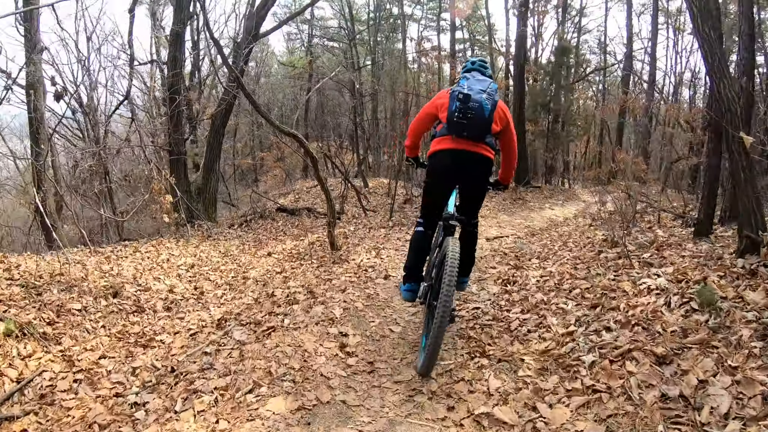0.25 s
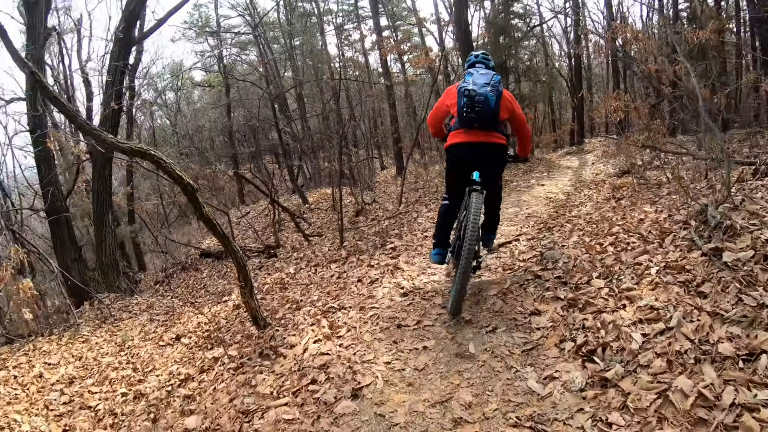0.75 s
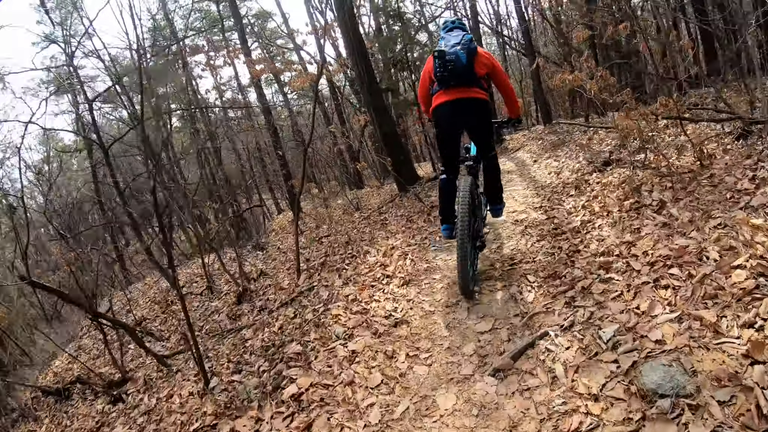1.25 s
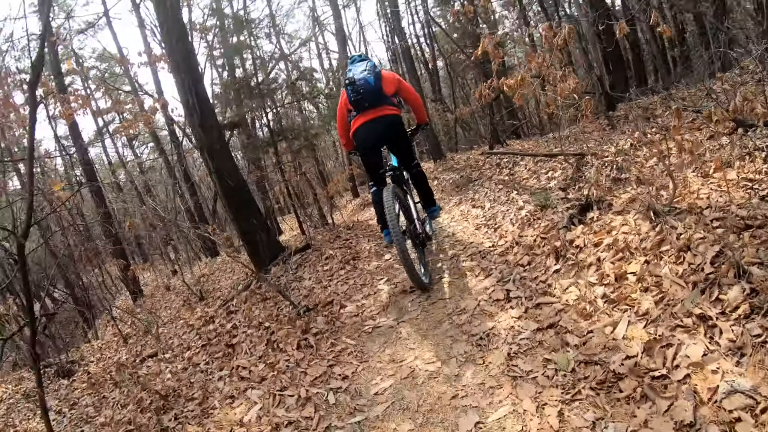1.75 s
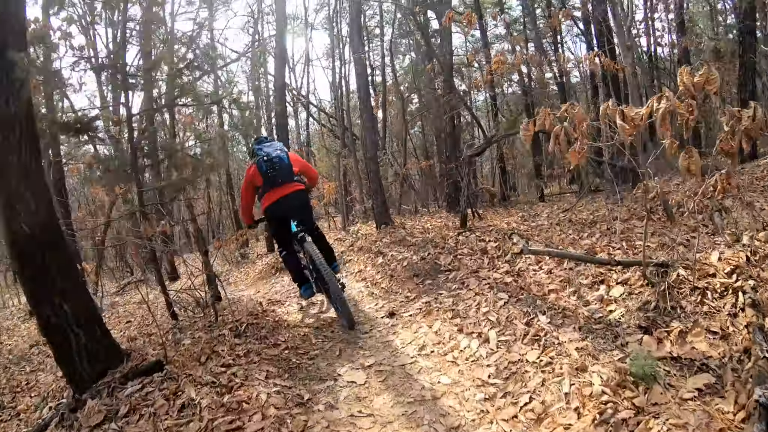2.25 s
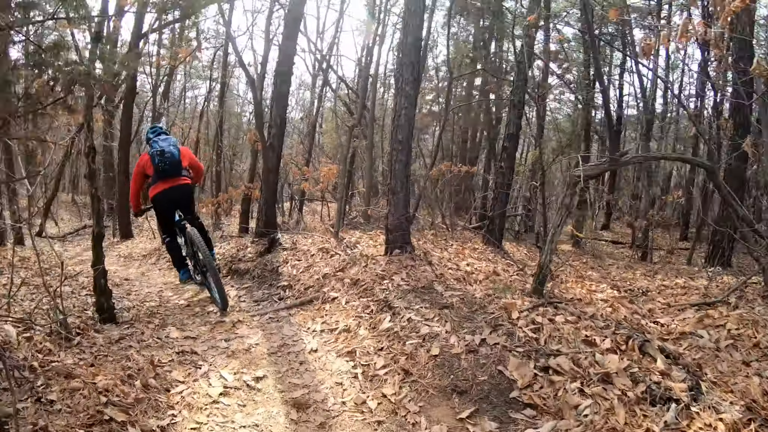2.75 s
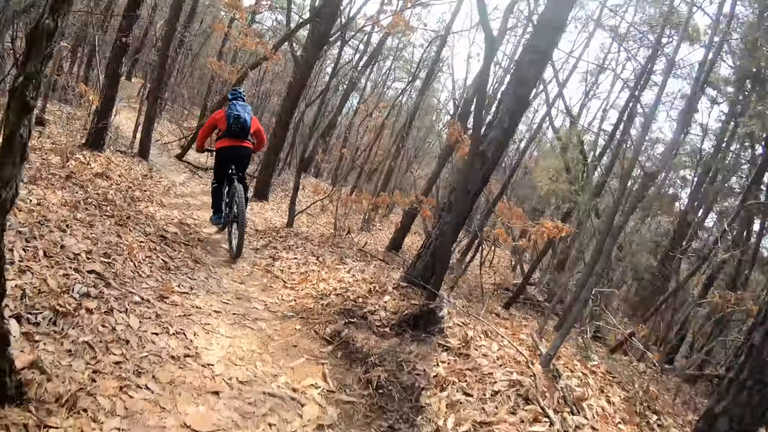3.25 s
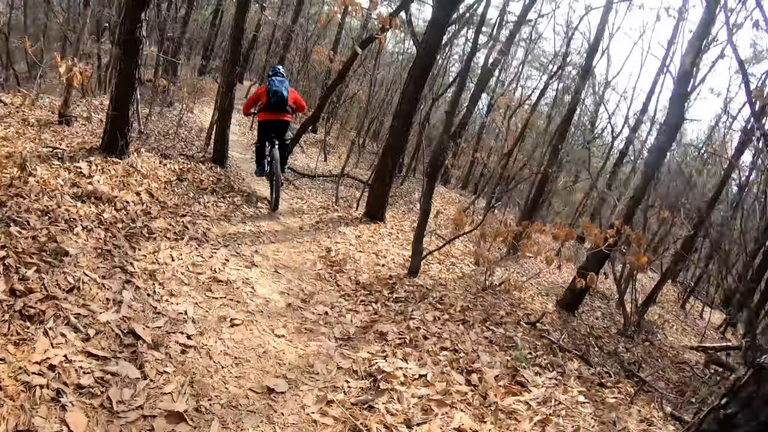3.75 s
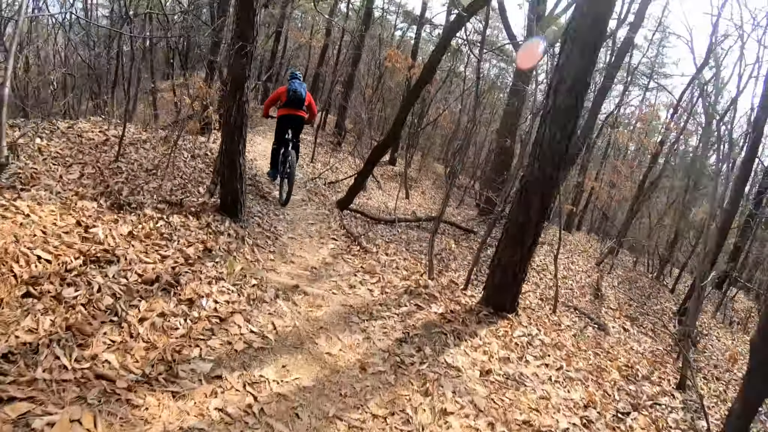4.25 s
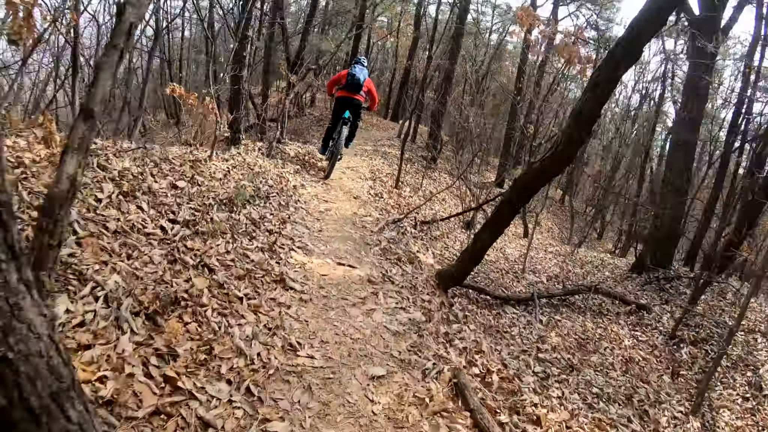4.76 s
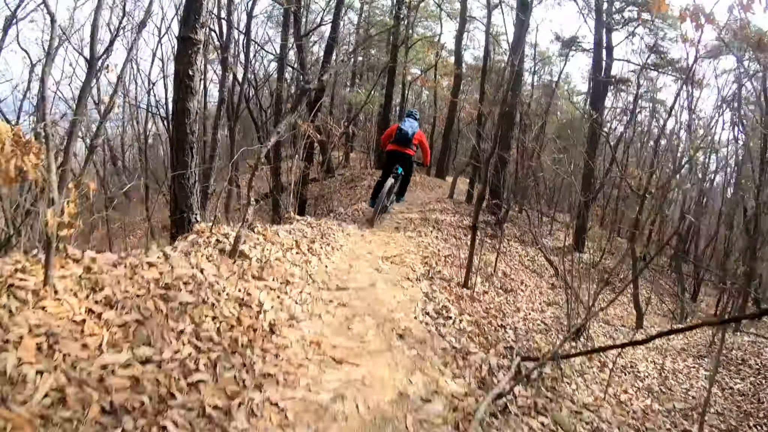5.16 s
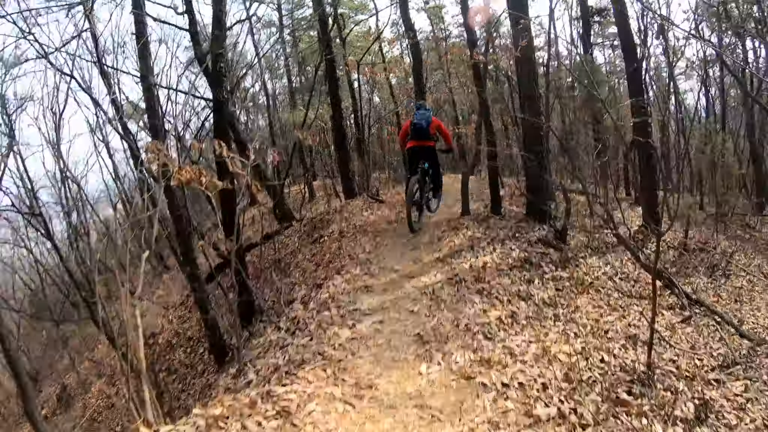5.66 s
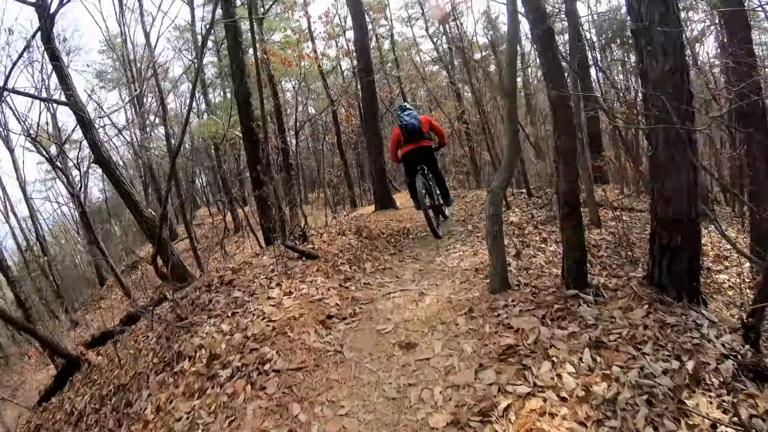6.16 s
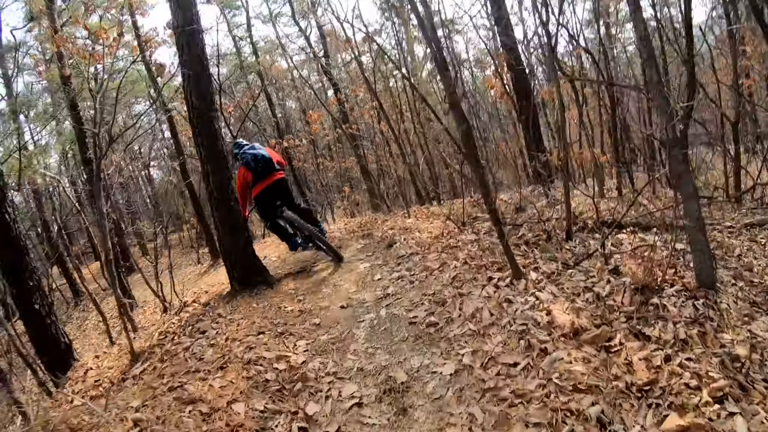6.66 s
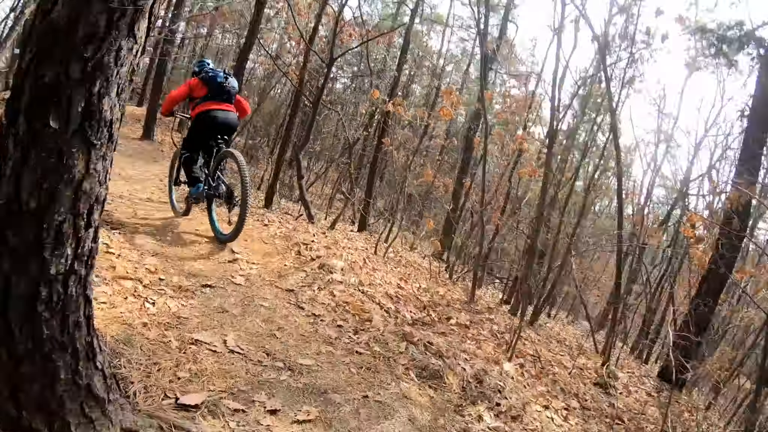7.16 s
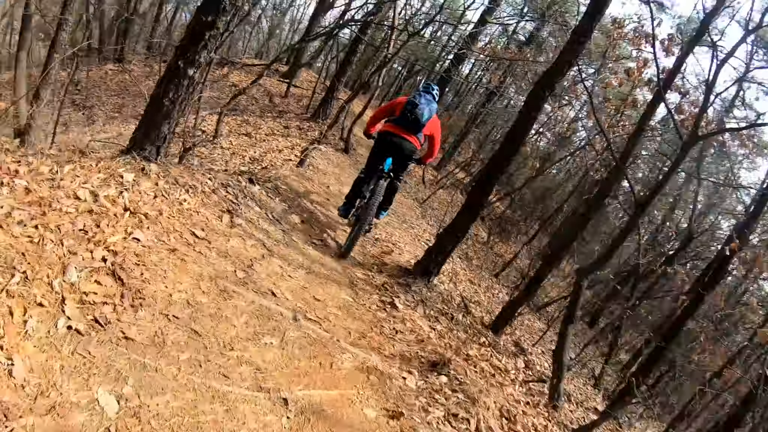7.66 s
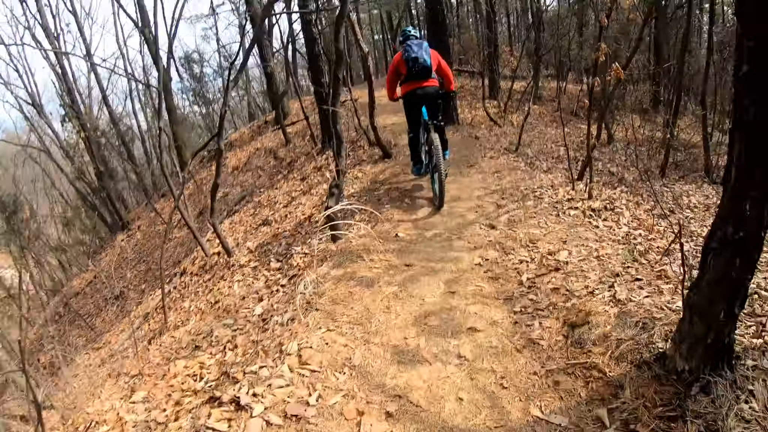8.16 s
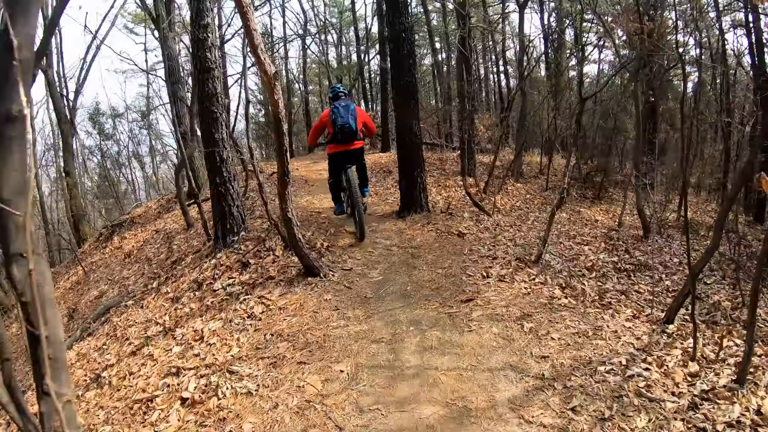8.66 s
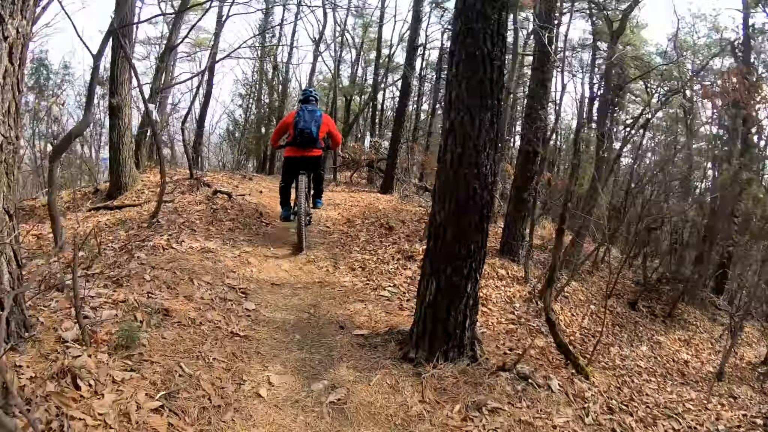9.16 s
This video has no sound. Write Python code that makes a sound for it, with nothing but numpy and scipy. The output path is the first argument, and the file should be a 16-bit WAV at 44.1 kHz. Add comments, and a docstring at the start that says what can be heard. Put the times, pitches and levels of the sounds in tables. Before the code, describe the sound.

A mountain bike descends a dry, leaf-covered forest trail, heard from a small cased camera mounted on it. Low wind rumble and fluttering buffets run throughout, swelling in irregular gusts, with a faint bright swish behind. Tyres crackle and crush leaves in uneven clumps. In the first second there are light clicks, a brief rub and soft thumps; around 1.4-1.9 s a sharper jolt brings clicks, hollow knocks and rapid chatter. It eases until about 3 s, then from 3.4 to 4.1 s hard bumps, crunches and rattles crowd together. More jolts and small scrapes come at 4.4-5.3 s, with stronger wind. A smoother roll follows until 6.5 s. The heaviest thumps and plastic knocks hit near 6.9 s, with a strong gust at 7.2 s, a knock at 7.8 s and a busy cluster at 7.9-8.6 s. It calms, then clicks and gusts again around 9.4 s.

```python
"""On a dry, leafy forest trail a small camera rides down on a mountain bike.
Wind is shaped noise in lumps and gusts; leaves under the tyres are many short cracks and crushing noise.
Bumps thump as sagging sine swings; loose parts click and chatter, and knocks ring the case's modes.
Gusts and rough ground ring the hollow too; rubs and a rushing swish lie behind."""
import sys
import numpy as np
from scipy import signal
from scipy.fft import rfft, irfft, next_fast_len
from scipy.io import wavfile

SR = 44100
rng = np.random.default_rng(int(sys.argv[2]) if len(sys.argv) > 2 else 0)


def persist_wave(psi):
    """Save psi, clipped to +-1, as 16-bit WAV."""
    counts = np.round(np.clip(psi, -1, 1) * 32767).astype(np.int16)
    wavfile.write(sys.argv[1], SR, np.atleast_2d(counts).T)


N = 415422  # length in samples

# Hollow of the camera case. Each row: mode frequency in Hz, relative level in dB, t60 in seconds.
HOLLOW_MODES = [(1211.7, -4.5, 0.034), (1296, -3.5, 0.046), (1386, -3, 0.039), (1478, -2, 0.022),
                (1628, -4, 0.014), (1848, -8.5, 0.014)]


def wind():
    """Eddies pass the port in lumps; the smaller the eddy, the faster and deeper the lumps."""
    # Steady wind. Each row: time in seconds, then relative levels in dB of slow rumble, buffeting, sharp edge.
    steady_wind = [(0.0, -41, -40, -37), (0.08, -25.5, -35.5, -35), (0.68, -31, -38, -50.5),
                   (1.44, -25, -31.5, -41.5), (2.2, -30.5, -34, -50.5), (2.94, -27, -41.5, -39),
                   (3.41, -25.5, -26, -33), (3.88, -31, -22.5, -37.5), (4.3, -24, -24.5, -37.5),
                   (5.14, -22, -17, -34), (5.4, -22.5, -27, -42.5), (6.58, -31.5, -29, -45),
                   (6.95, -27, -30, -37.5), (7.53, -29.5, -27.5, -39), (8.18, -17.5, -21.5, -46),
                   (8.21, -37, -30.5, -49), (9.05, -23.5, -31, -49), (9.42, -35, -52, -54)]
    # Gusts slap the port. Each row: time of the top in seconds, relative buffeting level in dB,
    # relative sharp edge level in dB, length in seconds.
    gust_events = [(0.06, -17.5, -51, 0.2), (0.29, -19.5, -47, 0.066), (0.56, -17.5, -39, .12),
                   (1.49, -16, -37, 0.088), (1.79, -17.5, -36, 0.15), (2.55, -25.5, -53, 0.096),
                   (3.06, -25, -54, 0.18), (3.18, -19.5, -43, 0.039), (3.33, -19, -34, 0.11),
                   (3.53, -17.5, -36, 0.12), (3.72, -16, -27, 0.1), (3.95, -18, -36, 0.57),
                   (4.2, -23, -31, 0.13), (4.59, -17.5, -23.5, 0.15), (4.8, -31, -18, 0.032),
                   (4.98, -23, -22.5, 0.1), (5.22, -17.5, -24, 0.21), (5.62, -21, -33.5, 0.1),
                   (6.28, -21.5, -34.5, 0.19), (6.67, -16.5, -40, 0.1), (6.89, -16, -30, 0.11),
                   (7.19, -9.5, -32, 0.067), (7.84, -31, -41, 0.14), (8.06, -24, -30.5, 0.13),
                   (8.24, -19.5, -31.5, 0.096), (8.38, -17.5, -33, 0.16), (8.85, -17, -39, 0.066),
                   (9.4, -14.5, -28.5, 0.21)]
    # Colours of the three wind layers. Each row: frequency in Hz, relative density in dB per Hz.
    rumble_colour = [(15, -5.5), (25, -1.5), (45, -1), (70, -6), (110, -11.5), (160, -31)]
    buffet_colour = [(50, -18), (90, -5), (140, -1.5), (200, 1), (280, -5.5), (400, -15.5), (600, -44)]
    edge_colour = [(250, -11), (420, -1.5), (600, -7), (850, -15.5), (1100, -15), (1500, -49)]
    rumble_under_gust_db = -7.5  # slow rumble a gust brings along, against its buffeting
    edge_in_hollow_db = -8  # the sharp edge also blows across the hollow of the case

    rumble_db, buffet_db, edge_db = in_time(steady_wind)
    # shares of a gust's length in which it swells and dies by 1/e
    gust, gust_edge = swells(gust_events, rise=0.3, fall=0.42)
    white = rng.standard_normal((3, N))
    eddies = drift(29.8)

    rumble_gain = np.hypot(from_db(rumble_db - 2.0), from_db(rumble_under_gust_db) * gust)
    rumble = colour(white[0], rumble_colour) * rumble_gain

    buffet_gain = from_db(-2.5) * np.hypot(from_db(buffet_db), gust)
    buffet = colour(white[1] * from_db(2.97 * eddies), buffet_colour) * buffet_gain

    tearing = white[2] * from_db(2.88 * eddies + 2.45 * drift(40.0))
    edge_gain = from_db(-1.5) * np.hypot(from_db(edge_db), gust_edge)
    edge = colour(tearing, edge_colour) + from_db(edge_in_hollow_db) * ring_hollow(tearing)
    return rumble + buffet + edge * edge_gain


def rolling():
    """Leaves snap in clumps under the tyres; the rough ground shakes the hollow case."""
    # Steady rolling. Each row: time in seconds, relative case shaking in dB, relative leaf crunch in dB.
    steady_roll = [(0.0, -31.5, -41.5), (0.81, -39.5, -42), (1.54, -29, -36.5), (1.86, -32.5, -44),
                   (2.23, -42, -43), (2.91, -43.5, -42), (3.67, -24.5, -37), (4.33, -39, -45),
                   (4.85, -34, -40), (5.17, -32.5, -40), (5.38, -43, -44.5), (6.53, -37, -44),
                   (6.82, -33.5, -38.5), (7.24, -29, -42.5), (7.69, -36.5, -43.5), (8.13, -28.5, -39),
                   (9.08, -43.5, -48), (9.42, -51, -51)]
    # A wheel runs over a root, stone or heap of leaves. Each row: time of the top in seconds,
    # relative shaking in dB, relative crunch in dB, length in seconds.
    jolts = [(0.03, -30, -33.5, 0.17), (0.26, -22, -35.5, 0.092), (0.85, -26.5, -37, 0.1),
             (1.33, -37, -36.5, 0.43), (1.47, -16.5, -25, 0.049), (1.75, -19, -28.5, 0.084),
             (2.0, -26.5, -36, 0.11), (2.26, -26, -29.5, 0.021), (2.53, -29, -39, 0.051),
             (2.92, -33, -37, 0.078), (3.12, -19.5, -29, 0.04), (3.44, -19, -29.5, 0.15),
             (3.52, -14, -22, 0.062), (3.7, -17.5, -19.5, 0.029), (3.85, -20, -25.5, 0.027),
             (3.94, -22.5, -32, 0.086), (4.03, -30, -34, .03), (4.09, -25, -31, 0.034),
             (4.24, -22, -38, 0.023), (4.44, -19, -31, 0.037), (4.59, -41, -41, 0.078),
             (4.7, -18, -31.5, 0.064), (4.87, -22.5, -32.5, 0.11), (4.97, -22, -25.5, 0.068),
             (5.05, -16, -23.5, 0.021), (5.27, -26.5, -42, 0.16), (5.72, -29.5, -35, 0.22),
             (6.62, -31.5, -35.5, 0.35), (6.88, -17, -24.5, 0.097), (6.98, -19, -30, 0.022),
             (7.22, -34, -36.5, 0.1), (7.37, -28, -61, 0.21), (7.58, -24.5, -34, 0.04),
             (7.78, -26, -35.5, 0.1), (7.95, -21.5, -35.5, 0.093), (8.04, -20, -32, 0.039),
             (8.15, -17, -25, 0.047), (8.28, -27, -36, 0.027), (8.38, -20, -33.5, 0.15),
             (8.52, -28, -46, 0.11), (9.34, -24, -30.5, 0.057), (9.41, -15.5, -30.5, 0.11)]
    # Colour of the crunch. Each row: frequency in Hz, relative density in dB per Hz.
    leaf_colour = [(800, -11), (1500, -3.5), (1920, -2.5), (3090, 0), (3490, -1), (4650, -4.5), (4950, -12),
                   (8300, -20), (9500, -25), (12000, -33), (15000, -55)]

    # shares of a jolt's length in which it swells and dies by 1/e
    jolt_gains = swells(jolts, rise=0.24, fall=0.54)
    shaking, crunching = np.hypot(from_db(in_time(steady_roll)), jolt_gains)
    clumps = drift(55.0)
    snaps = leaf_snaps(clumps)
    crushing = litter_crushing(clumps)

    sharp_snaps = rms_one(np.diff(snaps, prepend=0))
    crunch = colour(sharp_snaps + from_db(9.5) * crushing, leaf_colour)
    jostling = grains(900 * from_db(2.5 * clumps), spread_db=6.5)
    shake = rms_one(jostling) + from_db(-1.5) * crushing
    return from_db(-4.5) * shaking * ring_hollow(shake) + from_db(-4.0) * crunching * crunch


def leaf_snaps(clumps):
    """Every snap is a short crack at one of 16 pitches; higher ones are weaker and die sooner."""
    born = grains(1200 * from_db(5.4 * clumps), spread_db=11.0)
    pitches_hz = np.geomspace(1700, 12000, 16)
    dealt = rng.integers(0, len(pitches_hz), N)
    snaps = np.zeros(N)
    for k, hz in enumerate(pitches_hz):
        t60 = 0.005 * (3000 / hz) ** 0.45
        snaps += ring(born * (dealt == k), hz, t60) / np.sqrt(hz)
    return snaps


def litter_crushing(clumps):
    """Coarse and fine litter give way partly together, partly each band in its own time."""
    edges_hz = np.geomspace(700, 16000, 8)
    crushing = np.zeros(N)
    for band in zip(edges_hz, edges_hz[1:]):
        band_pass = signal.butter(2, band, "band", fs=SR, output="sos")
        noise = signal.sosfilt(band_pass, rng.standard_normal(N))
        crushing += noise * from_db(1.8 * clumps + 2.8 * drift(35.0))
    return crushing


def thumps(rise_s=0.0015, fade_s=0.012, sag=1.6):
    """After a bump the mount swings a few cycles with a sagging pitch."""
    # Bumps through the mount. Each row: start in seconds, relative peak in dB, starting pitch in Hz.
    bumps = [(0.24, -13, 222), (0.55, -22, 199), (0.644, -12.5, 144), (1.48, -11.5, 202), (1.81, -10, 234),
             (2.549, -10.5, 122), (2.93, -18, 185), (3.406, -6, 246), (3.5, -9, 250), (3.538, -2.5, 232),
             (3.635, -9.5, 171), (3.7, -3, 211), (3.85, -4, 234), (3.93, -11, 304), (4.088, -9.5, 237),
             (4.582, -11, 236), (4.861, -15, 258), (4.962, -7, 292), (5.006, -5.5, 265), (5.296, -10, 202),
             (5.428, -10, 178), (5.781, -8.5, 237), (6.872, -1.5, 202), (6.906, -5, 226), (6.986, -7, 203),
             (7.178, -9, 193), (7.947, -9.5, 245), (8.034, -9.5, 295), (8.376, -3, 236), (8.58, -13.5, 218),
             (9.072, -10.5, 129)]
    out = np.zeros(N + SR)
    t = np.arange(SR // 10) / SR
    swell = (1 - np.exp(-t / rise_s)) * np.exp(-t / fade_s)
    turns = rng.random(len(bumps))  # starting phase in turns
    for (s, peak_db, hz), turn in zip(bumps, turns):
        at = round(s * SR)
        swing = np.sin(2 * np.pi * (hz * (t - sag * t ** 2) + turn))
        out[at:at + len(t)] += from_db(peak_db - 5.0) * swell / swell.max() * swing
    return out[:N]


def clicks(lead_s=0.0001):
    """A click rings the hollow, the shell and the fine treble modes of the case; a knock only the hollow."""
    # Loose parts click. Each row: time in seconds, relative level in dB, treble in dB against that level.
    loose_parts = [(0.02, -16.5, -11.5), (0.248, -22.5, -10.5), (0.2595, -17, -22), (0.408, -26, -16),
                   (0.4645, -23, -14), (1.1822, -23.5, -10), (1.293, -20, -19), (1.3243, -16, -25),
                   (1.3876, -20, -14), (1.394, -21, -20), (1.468, -14.5, -14.5), (1.504, -15, -25),
                   (1.7484, -11, -45), (1.775, -11, -39), (2.147, -20.5, -10.5), (2.2746, -26, -30),
                   (2.413, -22, -9.5), (2.4394, -19, -31), (2.903, -23, -10), (2.9312, -19.5, -36),
                   (2.9783, -24, -18), (3.05, -19.5, -14), (3.11, -25, -8.5), (3.1272, -20.5, -23),
                   (3.313, -24, -17), (3.4066, -24, -12), (3.425, -15, -26), (3.4428, -14, -18),
                   (3.451, -19, -13), (3.504, -14, -30), (3.516, -16, -28), (3.706, -12.5, -12),
                   (3.8314, -17.5, -24), (3.933, -11, -22.5), (3.9388, -13, -20), (3.9603, -15, -19),
                   (4.022, -21.5, -9), (4.09, -20.5, -18), (4.4302, -21, -17), (4.4413, -18, -31),
                   (4.4668, -20, -24), (4.5833, -25, -12), (4.597, -20.5, -24), (4.679, -18.5, -22),
                   (4.8227, -17, -19), (4.8814, -31, -29), (4.8968, -31, -33), (4.9561, -19, -10.5),
                   (4.9853, -14, -16), (4.9963, -15, -14.5), (5.698, -24.5, -9.5), (5.7087, -18, -19),
                   (5.72, -17, -29), (5.7616, -21.5, -17), (5.7974, -17.5, -25), (6.5638, -16, -16.5),
                   (6.5745, -19.5, -29), (6.6684, -11.5, -22), (6.7088, -14.5, -28), (6.7985, -19, -18),
                   (6.8733, -17, -13), (6.8821, -10.5, -24), (6.9036, -19.5, -11), (7.2534, -32, -17),
                   (7.9518, -15, -36), (7.964, -14, -22), (8.0275, -14, -28), (8.0347, -12, -23),
                   (8.0442, -14.5, -19), (8.063, -16, -33), (8.097, -21, -32), (8.147, -12.5, -17),
                   (8.271, -18.5, -22), (8.362, -13, -12.5), (8.375, -11.5, -18), (8.3986, -13.5, -27),
                   (8.405, -16.5, -18), (8.4085, -14, -18), (8.4325, -19, -22), (8.5565, -24, -15),
                   (8.5753, -16.5, -24), (8.738, -24, -18), (9.329, -25, -11), (9.3606, -14, -17.5),
                   (9.3715, -12, -26)]
    # Dull knocks. Each row: start in seconds, relative level in dB.
    knocks = [(0.533, -17), (0.839, -8), (1.325, -12), (1.423, -5.5), (3.385, -5), (3.498, -10),
              (3.693, -5), (3.9267, -12), (4.0219, -2), (4.948, -9), (5.05, -3), (6.6185, -3),
              (6.8433, -10), (6.8668, 1.5), (7.002, -10), (7.126, -8.5), (7.213, -6), (7.7697, -1),
              (8.3554, -22), (8.523, -5.5)]
    # Shell and treble of the case. Each row: mode frequency in Hz, relative level in dB, t60 in seconds.
    shell_modes = [(2120, -7, 0.016), (2910, -1, 0.005), (3500, -2, 0.013), (4260, -3, 0.0092)]
    treble_modes = [(5100, 1.9, 0.011), (6440, 12.6, 0.0029), (8040, 2.8, 0.0044), (9330, 1.1, 0.0041)]

    s, peak_db, treble_db = np.transpose(loose_parts + rattles())
    knock_s, knock_db = np.transpose(knocks)
    touch_s = s - lead_s
    body = strike(touch_s, peak_db - 10.0, HOLLOW_MODES, contact_s=0.00068)
    body += strike(touch_s, peak_db - 9.5, shell_modes, contact_s=0.0005)
    body += strike(knock_s, knock_db - 13.5, HOLLOW_MODES, contact_s=0.0019)
    edge = strike(touch_s, peak_db + treble_db - 9.0, treble_modes, contact_s=0.001)

    # light parts push no bass, and the padded case dulls the sharpest edges
    body_band = signal.butter(3, [1000, 5300], "band", fs=SR, output="sos")
    edge_low_pass = signal.butter(4, 10500, fs=SR, output="sos")
    return signal.sosfilt(body_band, body) + signal.sosfilt(edge_low_pass, edge)


def rattles():
    """A slack part chatters against the frame in taps, each a little off in time and strength."""
    # Runs of taps. Each row: first tap in seconds, last tap in seconds, gap in seconds, relative level in dB.
    runs = [(0.051, 0.134, 0.0277, -23), (0.295, 0.383, 0.029, -28), (1.557, 1.682, .031, -28),
            (1.796, 1.919, .0305, -22), (1.999, 2.120, 0.0305, -21), (2.529, 2.628, 0.033, -25),
            (3.555, 3.610, 0.027, -16), (3.666, 3.767, .0335, -18), (4.206, 4.277, 0.035, -23),
            (5.027, 5.159, 0.033, -28), (5.212, 5.333, .030, -24), (6.971, 7.036, 0.0325, -19),
            (7.171, 7.237, 0.033, -21), (7.516, 7.671, 0.031, -24.5), (7.805, 7.893, 0.029, -24),
            (8.154, 8.185, .031, -16)]
    treble_db, spread_db, jitter_s = -31, 1.5, 0.0005
    taps = []
    for first, last, gap, db in runs:
        count = round((last - first) / gap) + 1
        taps += [(first + k * gap, db) for k in range(count)]
    chance = rng.standard_normal((len(taps), 2))
    return [(s + jitter_s * late, db + spread_db * loud, treble_db)
            for (s, db), (late, loud) in zip(taps, chance)]


def strike(s, level_db, modes, contact_s):
    """A sharp touch and a short scuffle strike all modes at once, each a little harder or softer."""
    first_touch = 1.3  # strength of the sharp contact against the scuffle that follows
    at = np.clip(np.round(s * SR).astype(int), 0, N)
    after = np.arange(500)
    progress = after / (contact_s * SR)
    contact = progress ** 2 * np.exp(-2 * progress)  # crests after contact_s
    scuffle = contact * rng.standard_normal((len(at), len(after)))
    scuffle /= np.linalg.norm(scuffle, axis=1, keepdims=True)
    blow = scuffle + first_touch * (after == 0)
    uneven_db = 1.5 * rng.standard_normal((len(at), len(modes)))
    out = np.zeros(N)
    for k, (hz, mode_db, t60) in enumerate(modes):
        gain = from_db(level_db + mode_db + uneven_db[:, k])
        force = np.zeros(N + len(after))
        np.add.at(force, at[:, None] + after, gain[:, None] * blow)
        out += ring(force[:N], hz, t60) * (-1) ** k
    return out


def rubs():
    """Something rubs along the case: dense small slips that swell quickly and die more slowly."""
    # Rubs. Each row: time of the top in seconds, level in dB, length in seconds.
    rub_events = [(0.225, -28.5, 0.032), (4.57, -35, .06), (4.64, -32.5, .1), (4.8, -26, 0.052),
                  (5.2, -49, 0.1)]
    # Colour of a rub. Each row: frequency in Hz, relative density in dB per Hz.
    rub_colour = [(400, -23), (700, 4), (1100, 5), (2000, 0), (2800, -10.5), (4000, -41)]
    gain, = swells(rub_events, rise=0.13, fall=0.5)
    return gain * colour(grains(2500, spread_db=1.5), rub_colour)


def swish():
    """Far leaves swish and air rushes past: coloured noise with a slowly wavering level."""
    # Swish. Each row: time in seconds, level in dB around which it wavers.
    swish_curve = [(0, -54), (1.1, -49.5), (1.35, -49.5), (1.6, -55), (2.7, -50), (4.4, -60), (5.3, -52),
                   (5.6, -53.5), (6.3, -48), (6.55, -50.5), (8.5, -53.5), (9.42, -50)]
    # Colour of the rushing. Each row: frequency in Hz, relative density in dB per Hz.
    rush_colour = [(1500, 2.5), (2370, 1.5), (3300, 11.5), (4500, -11), (5000, -5), (6500, -19),
                   (8000, -12), (9600, -33), (12500, -32), (15000, -56)]
    level_db, = in_time(swish_curve)
    return colour(rng.standard_normal(N), rush_colour) * from_db(level_db + 1.2 * drift(12.0))


def from_db(db):
    """Decibels to gain."""
    return 10 ** (np.asarray(db) / 20)


def rms_one(x):
    """Scale to rms 1."""
    return x / np.sqrt(np.mean(x ** 2) + 1e-20)


def in_time(rows):
    """Every column of a curve at every sample."""
    s, *columns = np.transpose(rows)
    return [np.interp(np.arange(N) / SR, s, c) for c in columns]


def swells(events, rise, fall):
    """Gain of each level column: every event swells to its top and dies away; powers add."""
    s, *levels_db, length = np.transpose(events)
    step = 40  # samples between computed points
    t = np.arange(0, N + step, step)[:, None] / SR - s
    fade_s = np.maximum(length, 0.01) * np.where(t < 0, rise, fall)
    power = np.exp(-2 * np.abs(t) / fade_s)
    points = np.arange(len(t))
    return [np.interp(np.arange(N) / step, points, np.sqrt(power @ from_db(2 * db))) for db in levels_db]


def drift(rate_hz):
    """Slow chance: noise at every 20th sample through a double one-pole low-pass; rms 1."""
    step, settle = 20, 2000
    r = np.exp(-2 * np.pi * step * rate_hz / SR)
    noise = rng.standard_normal(N // step + settle + 2)
    slow = signal.lfilter([1], [1, -2 * r, r * r], noise)[settle:]
    return np.interp(np.arange(N) / step, np.arange(len(slow)), rms_one(slow))


def grains(per_s, spread_db):
    """Random clicks of uneven size and sign."""
    sizes = from_db(spread_db * np.minimum(rng.exponential(1, N), 4))
    signs = rng.choice([-1, 1], N)
    return sizes * signs * (rng.random(N) < per_s / SR)


def colour(x, spectrum):
    """Shape a sound by a spectrum in dB over log frequency; rms 1."""
    size = next_fast_len(N)
    hz = np.maximum(np.arange(size // 2 + 1) * SR / size, 1)
    points_hz, points_db = np.transpose(spectrum)
    inside = (hz > points_hz[0] / 2) * (hz < points_hz[-1] * 2)
    gain = inside * from_db(np.interp(np.log(hz), np.log(points_hz), points_db))
    return rms_one(irfft(rfft(x, size) * gain, size)[:N])


def ring(force, hz, t60):
    """A two-pole resonator: a unit click sets a decaying sine of starting height 1 ringing."""
    r = from_db(-60 / (t60 * SR))
    w = 2 * np.pi * hz / SR
    return signal.lfilter([0, np.sin(w)], [1, -2 * r * np.cos(w), r * r], force + 1e-18)


def ring_hollow(force):
    """A lasting force rings the hollow's modes, alternating in sign; rms 1."""
    out = np.zeros(N)
    for k, (hz, db, t60) in enumerate(HOLLOW_MODES):
        out += from_db(db) * ring(force, hz, t60) * (-1) ** k
    return rms_one(out)


def scene():
    """All sources meet at the one microphone."""
    return (wind() + rolling() + thumps() + clicks() + rubs() + swish())[None]


def record(dry):
    """Peaks are rounded, the top is cut."""
    rounded = 1.13 * np.tanh(dry / 0.82)
    top_cut = signal.cheby2(12, 70, 15500, fs=SR, output="sos")  # 70 dB down from 15.5 kHz
    return signal.sosfilt(top_cut, rounded)


dry = scene()
out = record(dry)
persist_wave(out)
```